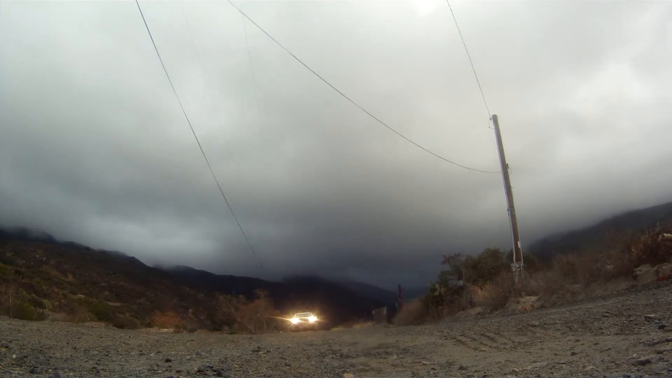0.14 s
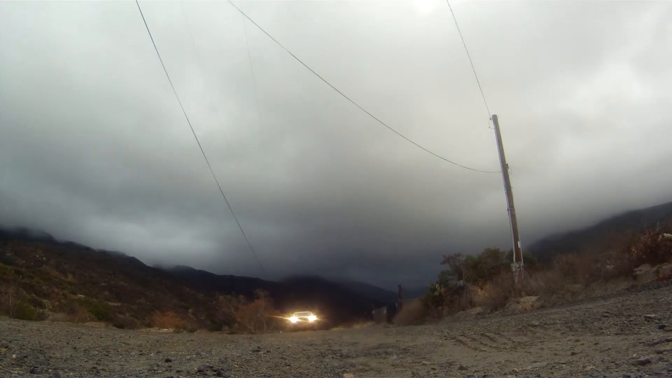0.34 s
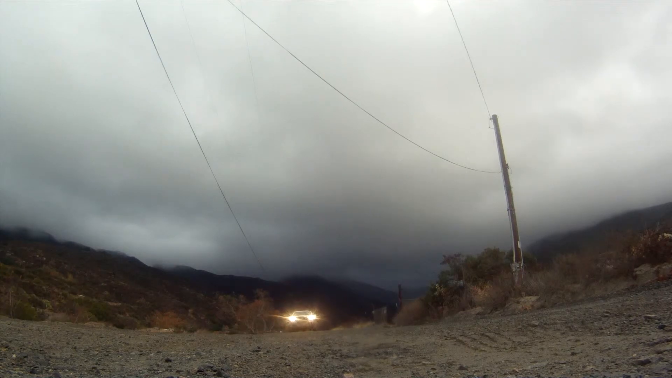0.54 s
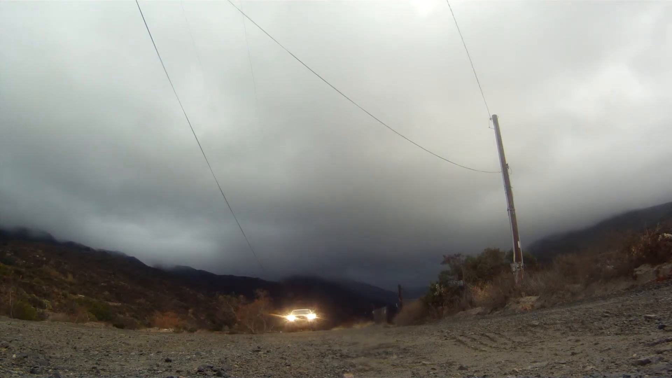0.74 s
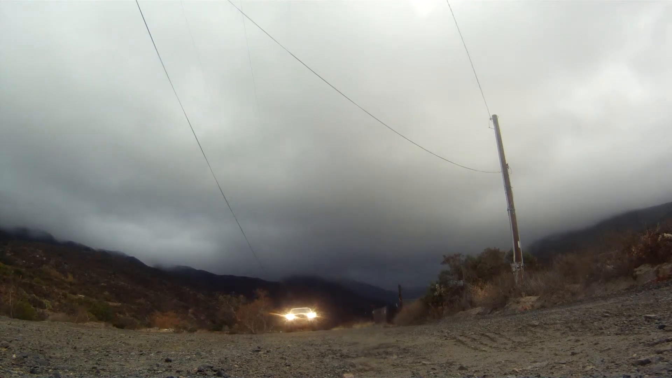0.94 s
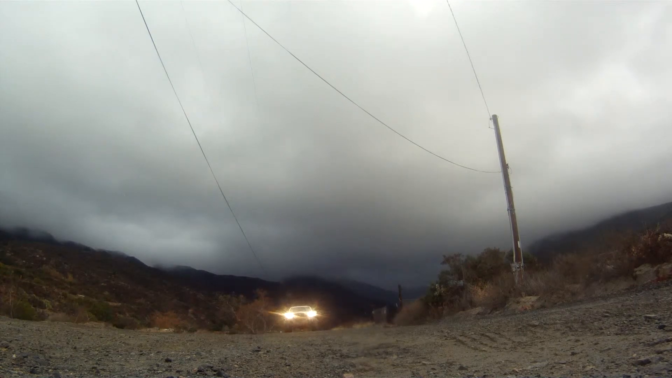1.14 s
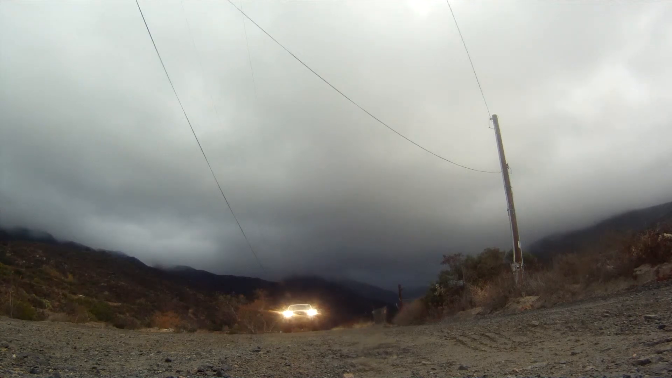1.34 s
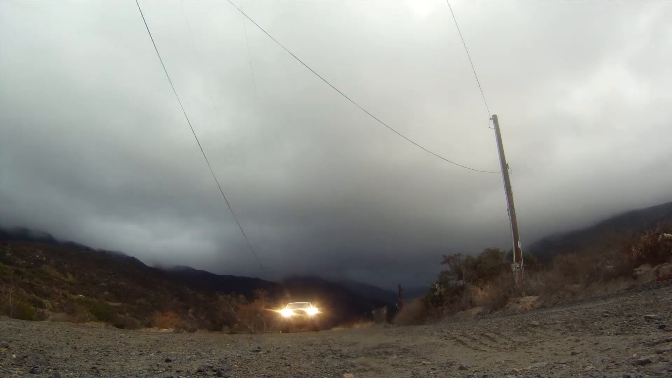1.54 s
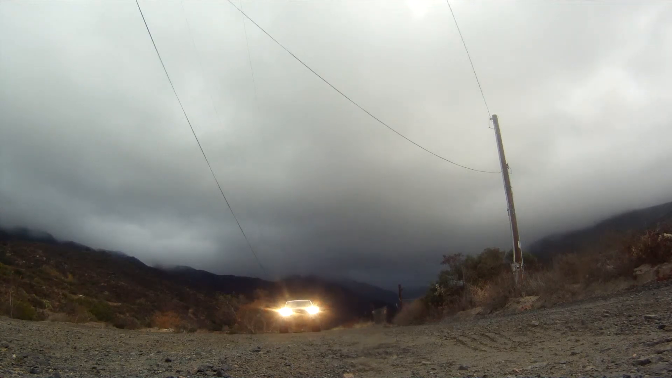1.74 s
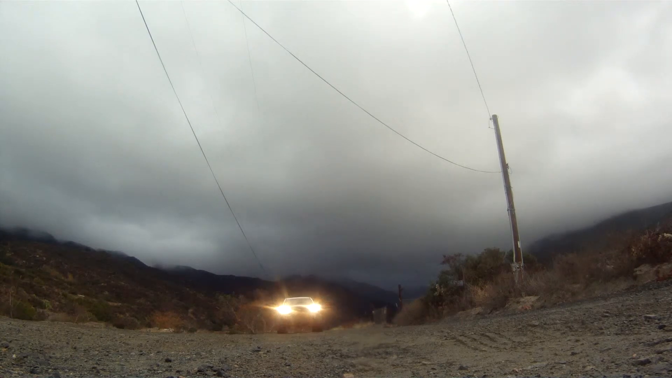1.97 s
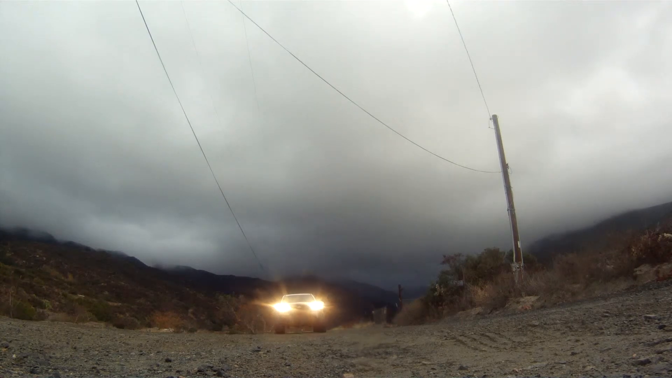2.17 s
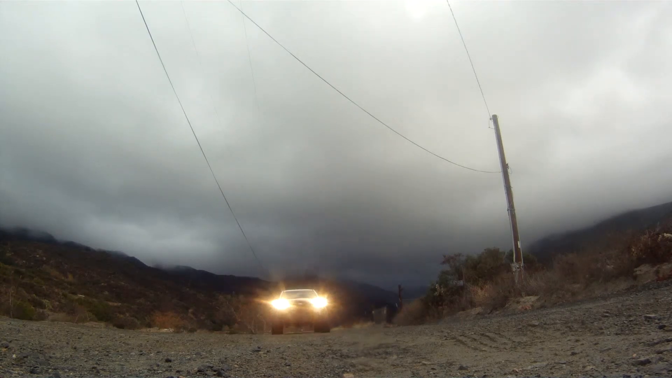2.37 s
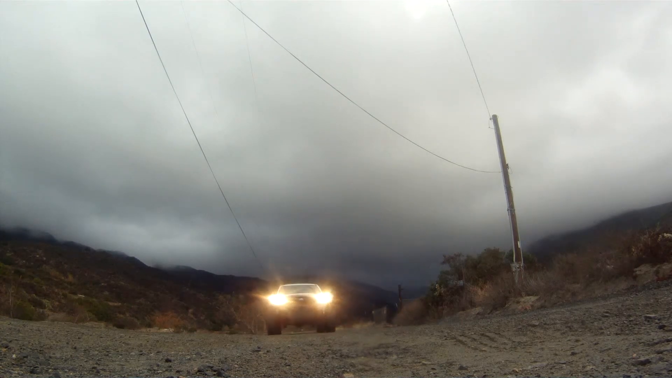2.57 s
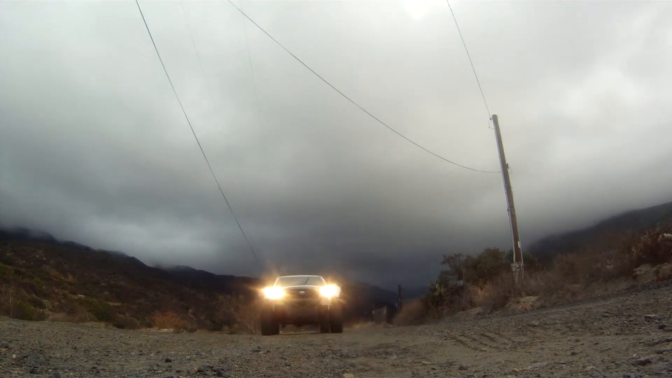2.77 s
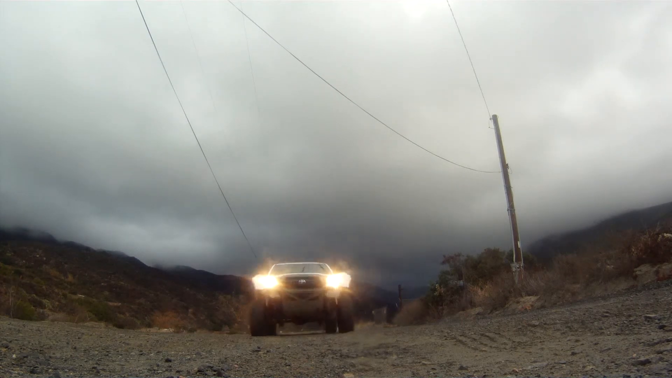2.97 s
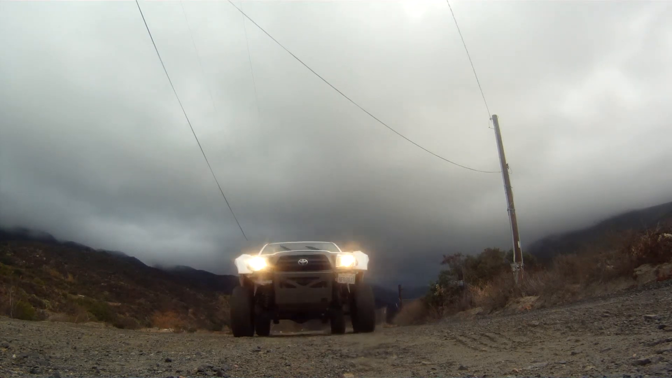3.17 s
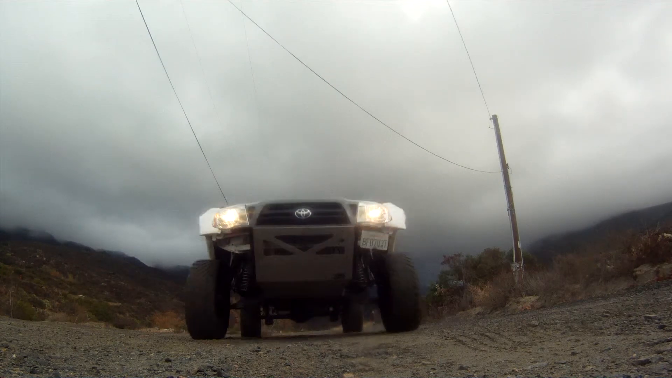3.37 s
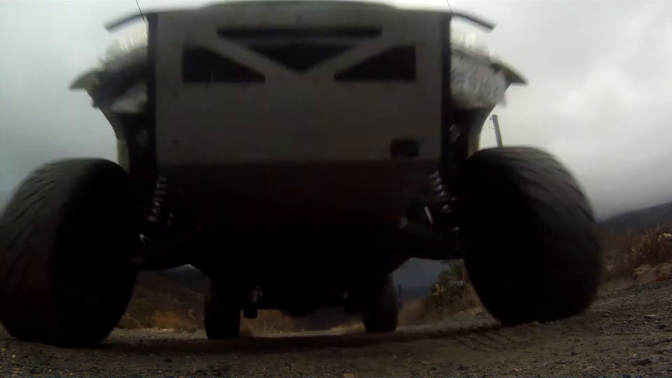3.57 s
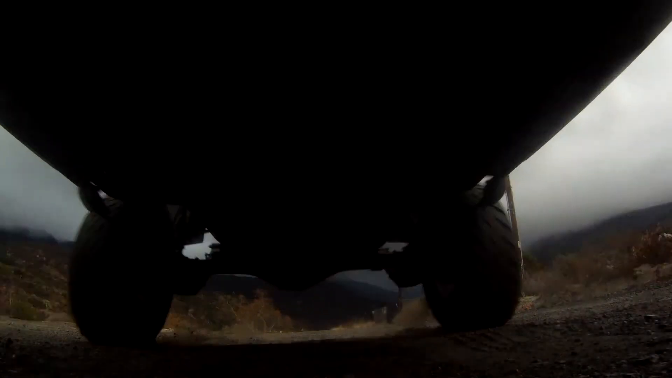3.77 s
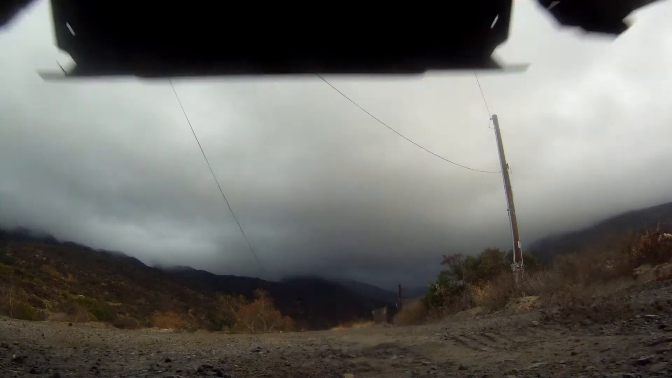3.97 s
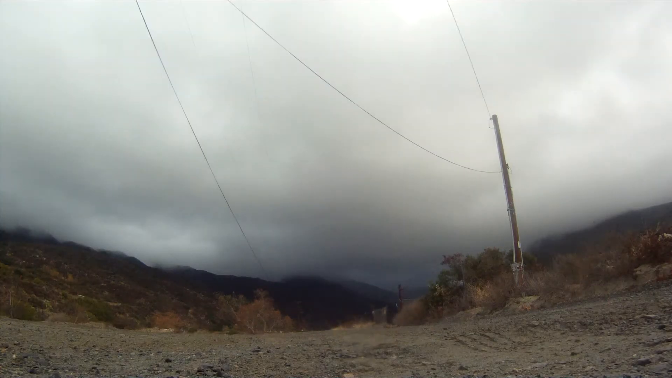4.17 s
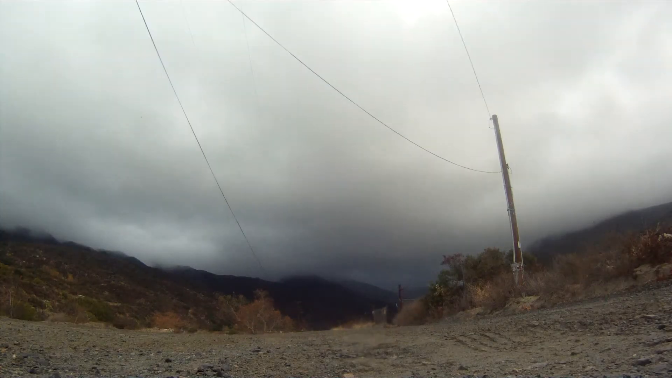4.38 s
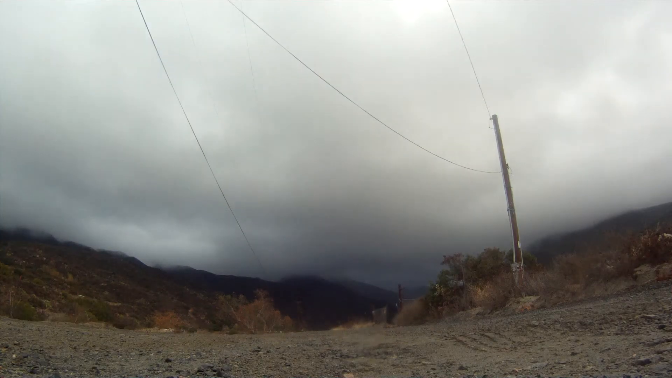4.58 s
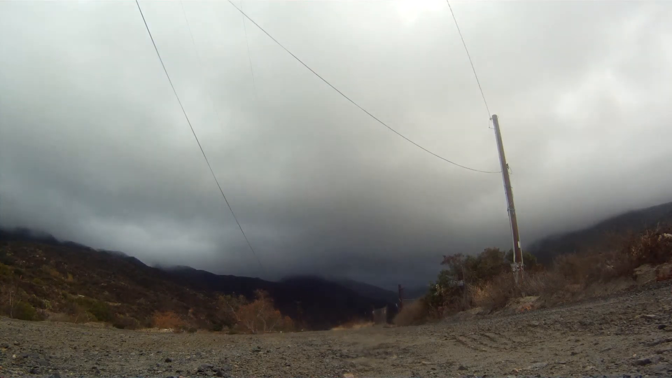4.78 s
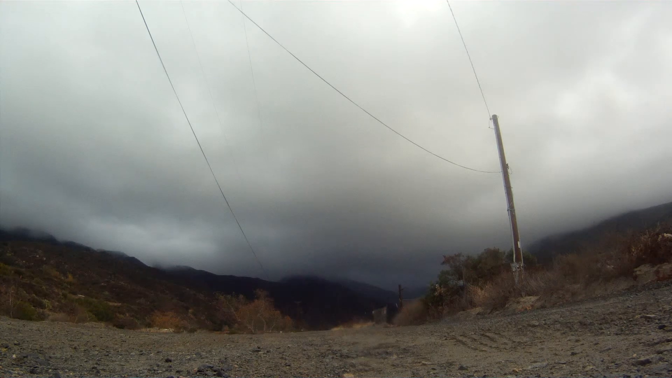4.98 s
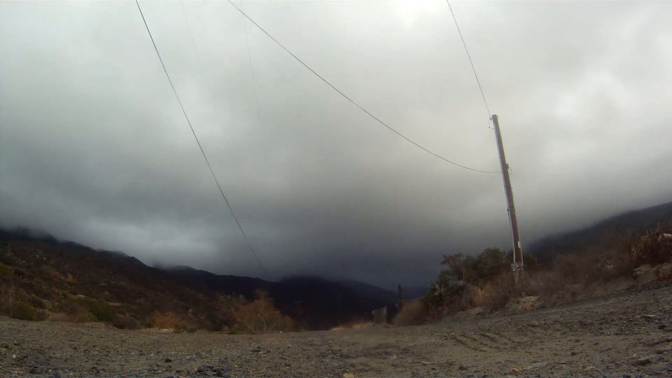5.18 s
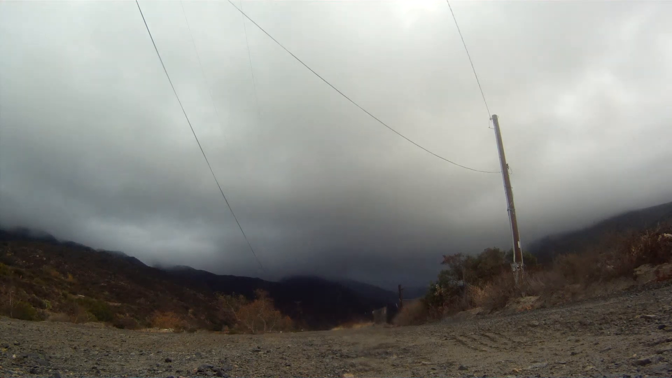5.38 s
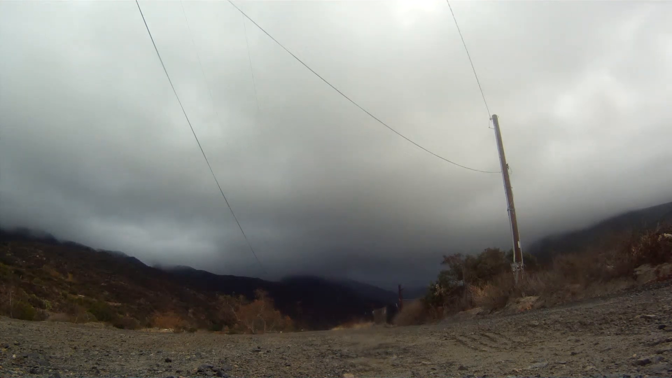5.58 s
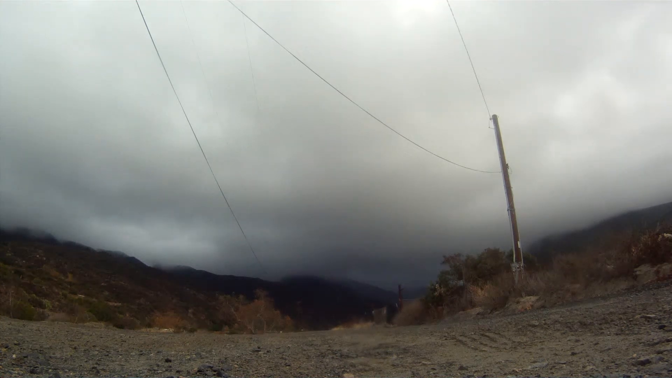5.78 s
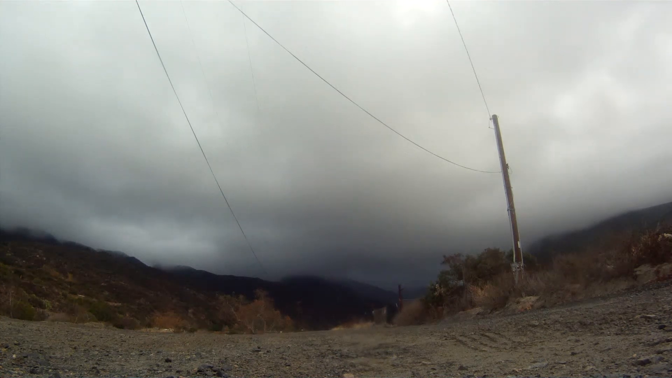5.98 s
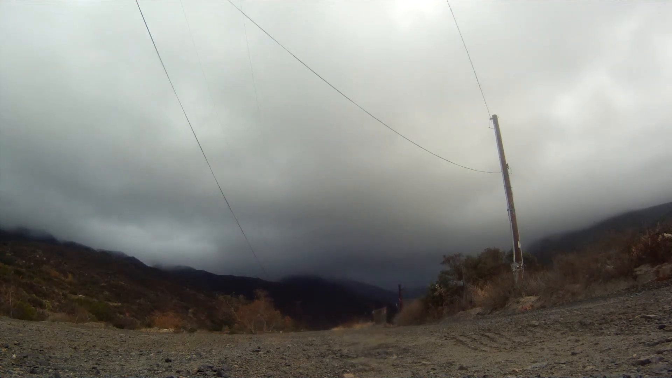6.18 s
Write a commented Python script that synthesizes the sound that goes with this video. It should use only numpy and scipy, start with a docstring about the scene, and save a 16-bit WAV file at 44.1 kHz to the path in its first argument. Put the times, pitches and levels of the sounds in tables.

```python
"""On a gravel track on an open hillside, a six-cylinder pickup drives straight over a small camera
on the ground and rolls away. The exhaust drones, the tyres roar and crunch, and ruts knock the
suspension. Air dragged along by the truck buffets the microphone, and thrown stones land behind it.
The camera holds each sample at a low rate, which mirrors the sound into a thin, glassy treble."""
import sys
import numpy as np
from scipy import signal
from scipy.fft import rfft, irfft, next_fast_len
from scipy.io import wavfile

SR = 44100
rng = np.random.default_rng(int(sys.argv[2]) if len(sys.argv) > 2 else 0)


def bounce(signal):
    """Save signal as a 16-bit WAV file at the path given by the first command-line argument."""
    frames = np.transpose(np.atleast_2d(signal))
    limited = np.clip(frames, -1, 1)
    pcm = np.round(limited * 32767).astype(np.int16)
    wavfile.write(sys.argv[1], SR, pcm)


N = 274302
TIME = np.arange(N) / SR
# when each part of the truck is over the microphone
FRONT_S, BAY_S, CHASSIS_S, REAR_S, TAILPIPE_S = 3.758, 3.785, 3.797, 3.92, 3.945


def gain_of(db):
    """Turns decibels into a number to multiply by."""
    return 10 ** (np.asarray(db) / 20)


def evened(x):
    """Scales x to an average strength (rms) of 1."""
    return x / np.sqrt(np.mean(x ** 2) + 1e-20)


def curves(table):
    """Joins the rows of a time table with straight lines, one curve a column."""
    times, *columns = np.transpose(table)
    return [np.interp(TIME, times, column) for column in columns]


def during(table, fade_s=0.23):
    """1 from a table's first time to its last, fading out beyond them."""
    start, end = table[0][0], table[-1][0]
    return np.interp(TIME, [start - fade_s, start, end, end + fade_s], [0, 1, 1, 0])


def gain_at(spectrum, hz):
    """Looks up hz in a spectrum (a table of level by frequency); past its end the gain falls fast."""
    f, db = np.transpose(spectrum)
    octaves = np.log2(hz + 1)
    beyond = np.maximum(octaves - np.log2(f[-1]), 0)
    return gain_of(np.interp(octaves, np.log2(f), db) - 40 * beyond)


def colour(x, spectrum):
    """Filters x by a spectrum, then scales it to a strength of 1."""
    size = next_fast_len(len(x))
    gains = gain_at(spectrum, np.fft.rfftfreq(size, 1 / SR))
    return evened(irfft(rfft(x, size) * gains, size)[:len(x)])


def drift(rate_hz):
    """A smooth random wobble of strength 1, up to about rate_hz fast."""
    t = TIME[::32]
    hz = np.fft.rfftfreq(len(t), t[1])
    slow = irfft(rfft(rng.standard_normal(len(t))) / (1 + (hz / rate_hz) ** 4), len(t))
    return np.interp(TIME, t, evened(slow))


def grains(per_s, spread_db):
    """Random clicks of mixed sizes."""
    sizes = gain_of(spread_db * np.minimum(rng.exponential(1, N), 4))
    return rng.standard_normal(N) * sizes * (rng.random(N) < per_s / SR)


def add(mix, at_s, sound):
    """Lays a sound into the mix, starting at at_s."""
    part = mix[round(at_s * SR):][:len(sound)]
    part += sound[:len(part)]


def crossing(at_s, over_s):
    """Goes from 0 to 1 in over_s, centred on at_s."""
    return np.clip(.5 + (TIME - at_s) / over_s, 0, 1)


def swell(at_s, half_s):
    """A smooth rise and fall, 1 at at_s."""
    return np.exp(-((TIME - at_s) / half_s) ** 2)


def passing(at_s, near_m, ahead_db, behind_db, speed_m_per_s=14.42):
    """Gain of a passing part: 1 when closest, ahead_db or behind_db less as the distance doubles."""
    along_m = speed_m_per_s * (TIME - at_s)
    doublings = np.log2(np.hypot(along_m / near_m, 1))
    return gain_of(-doublings * np.where(along_m < 0, ahead_db, behind_db))


def wheels(front_db, rear_db, near_m, ahead_db, behind_db):
    """Gain of the front and rear wheels passing in turn."""
    return np.hypot(gain_of(front_db) * passing(FRONT_S, near_m, ahead_db, behind_db),
                    gain_of(rear_db) * passing(REAR_S, near_m, ahead_db, behind_db))


def once_past(drop_db, over_s):
    """Once the truck has passed, its sound drops by drop_db."""
    return gain_of(-drop_db * np.clip((TIME - REAR_S) / over_s, 0, 1))


def engine_gain(bay_db=-28.5, tailpipe_db=-21):
    """The engine bay carries far ahead; the tailpipe booms only close by."""
    bay = gain_of(bay_db) * passing(BAY_S, near_m=0.67, ahead_db=5.5, behind_db=7.0)
    tailpipe = gain_of(tailpipe_db) * passing(TAILPIPE_S, near_m=1.16, ahead_db=9, behind_db=12)
    return np.hypot(bay, tailpipe) * once_past(drop_db=9, over_s=0.37)  # the driver lifts off


# how often the cylinders fire, before any wobble: t/s, f/Hz
FIRING = [(0.0, 141.8), (0.16, 118.4), (0.3, 107.1), (0.75, 99.8), (1.0, 111.1), (1.25, 117), (1.84, 116.4),
          (1.96, 128.4), (2.1, 124.1), (2.42, 126.8), (2.85, 136), (3.3, 145), (3.5, 130), (3.65, 123.6),
          (3.9, 117.6), (4.1, 85.8), (4.42, 85.15), (4.65, 74.6)]
# the driven wheels hop and swing the revs: middle t/s, half length/s, hop f/Hz, share of the revs
WHEEL_HOP = (3.16, .22, 6.13, 0.058)
# tones at 1, 2, 3... times half the firing rate: level ahead/dB, level under the tailpipe/dB
EXHAUST_TONES = [(-17.5, -19), (-0.5, 0), (-15.5, -13.5), (-14, -13.5), (-14.5, -27.5), (-21, -23.5),
                 (-12.5, -31.5), (-23, -30), (-13, -48)]
# how the drone changes: t/s, tailpipe share (0-1), lift of the upper tones/dB
EXHAUST_BLEND = [(0, 0.26, 1), (1.85, 0.08, -2.5), (1.98, 0.12, 0.5), (3.1, 0.07, 2.5), (3.5, 0.08, 3),
                 (3.88, 0.78, -1), (4.17, 1, 5.5)]
# the pipe favours some pitches over others: f/Hz, level/dB
PIPE_SPECTRUM = [(40, 1.5), (150, 0.5), (190, 1.5), (240, -2), (275, 1.5), (310, -1.5), (360, 2),
                 (400, -3.5), (438, 4), (468, -4), (500, -8.5), (700, -4)]

def engine(uneven_db=-25, waver=0.33, jitter=0.00715, bumps=0.0074, cruise_hz=120):
    """Six cylinders fire in two banks of three and drone; unequal cylinders add weak extra tones."""
    steady_hz, = curves(FIRING)
    tailpipe, lift_db = curves(EXHAUST_BLEND)
    hop_s, hop_half_s, hop_hz, hop_share = WHEEL_HOP
    hop = swell(hop_s, hop_half_s) * np.cos(2 * np.pi * hop_hz * (TIME - hop_s))
    firing_hz = steady_hz * (1 + hop_share * hop)
    pulling_hard = crossing(2.09, over_s=.6) * (1 - crossing(3.4, over_s=0.32))
    jolts = bumps * drift(6.85) * pulling_hard  # bumps shake the revs
    firings = np.cumsum(firing_hz * (1 + jolts + jitter * drift(22.63))) / SR
    drone = np.zeros(N)
    for k, (ahead_db, behind_db) in enumerate(EXHAUST_TONES, 1):
        tone_db = ahead_db + tailpipe * (behind_db - ahead_db) + lift_db * (k > 2)
        unsteady = 1 + (.06 if k == 2 else waver) * drift(14.3)  # the firing tone is the steadiest
        tone = np.cos(np.pi * k * firings + 2 * np.pi * rng.random())
        drone += gain_of(tone_db) * gain_at(PIPE_SPECTRUM, firing_hz * k / 2) * unsteady * tone
    cycle = 2 * np.pi * firings / 6
    uneven = sum(np.cos(k * cycle + 2 * np.pi * rng.random()) for k in range(4, 15) if k % 3)
    drone += gain_of(uneven_db - 7 * tailpipe) * uneven * (1 + 0.75 * drift(11.6))
    effort = gain_of(2 * np.log2(firing_hz / cruise_hz))  # 2 dB louder at twice the revs
    return np.sqrt(2) * engine_gain() * effort * drone * during(FIRING)


# rough stretches of track: middle t/s, level/dB, half length/s
ROUGH_PATCHES = [(0.879, -65.5, 0.054), (1.116, -58, 0.22), (1.721, -62, 0.099), (4.993, -55.5, 0.047)]

def rough_ground():
    """Gain of the extra noise that the wheels make on rough stretches."""
    return sum(gain_of(db) * swell(at_s, half_s) for at_s, db, half_s in ROUGH_PATCHES)


# the tread's roar, and a hollow knock near 1 kHz from ahead and from behind: f/Hz, level/dB
ROAR_SPECTRUM = [(30, -21), (65, 6.5), (160, 5.5), (230, 2), (330, -1), (400, 0.5), (490, 1), (680, -1.5),
                 (900, -2.5), (1300, -33), (1700, -24)]
KNOCK_AHEAD = [(500, -32), (720, -7), (850, 0.5), (1000, 5.5), (1130, 1.5), (1220, -11), (1330, -19),
               (1600, -15.5), (2200, -29), (3000, -47)]
KNOCK_BEHIND = [(450, -43), (580, -0.5), (790, -7.5), (970, -28), (1080, 5.5), (1170, 4.5), (1270, -10.5),
                (1400, -2.5), (1520, -22), (2500, -28)]

def tyres(knock_db=-34.5, rough_roar_db=-7, sway_db=2.1, clump_db=2.0):
    """Tread roars on the dirt and knocks in clumps, more on rough ground, thinner from behind."""
    rough = rough_ground()
    rolling = wheels(front_db=-35, rear_db=-33.5, near_m=0.83, ahead_db=6.5, behind_db=6.0)
    rolling *= once_past(drop_db=7.0, over_s=0.34)
    shaking = gain_of(knock_db) * passing(CHASSIS_S, near_m=1.77, ahead_db=7.0, behind_db=4.5)
    shaking *= once_past(drop_db=14.0, over_s=0.11)
    pulling_away = gain_of(-7 * np.clip(1 - TIME / 2.68, 0, 1))  # quieter until it gathers speed
    roar_gain = np.hypot(pulling_away * rolling, gain_of(rough_roar_db) * rough)
    roar = colour(rng.standard_normal(N), ROAR_SPECTRUM) * gain_of(sway_db * drift(25))
    blows = grains(per_s=5000, spread_db=2.0) * gain_of(clump_db * drift(29.0))
    behind = crossing(3.984, over_s=0.34)
    knock = (1 - behind) * colour(blows, KNOCK_AHEAD) + behind * colour(blows, KNOCK_BEHIND)
    return roar * roar_gain + knock * np.hypot(pulling_away * shaking, rough)


# grinding stones, a thin whining hiss as the truck approaches, and sand close by: f/Hz, level/dB
CRUNCH_SPECTRUM = [(1000, -17), (1400, -10), (1620, -4), (1850, 0), (2080, -1), (2330, 1.5), (2550, 0.5),
                   (2850, -12.5), (3400, -13), (5000, -22)]
WHINE_SPECTRUM = [(2000, -16), (2900, -34), (3500, -21), (4200, -5), (4600, 10), (4820, 6), (5050, 11),
                  (5400, 1.5), (6000, 4.5)]
FIZZ_SPECTRUM = [(2000, -39), (2900, -5), (3500, -8), (4100, 2.5), (4700, -2), (5200, -2), (6000, -6.5)]

def gravel(rough_db=-13, whine_db=-6, clump_db=1.2, arrival_s=3.688):
    """Stones grind under the tread; a thin, whining hiss gives way to sand as the wheels arrive."""
    clumps = gain_of(clump_db * drift(35))
    crunch = colour(grains(per_s=12000, spread_db=0.5) * clumps, CRUNCH_SPECTRUM)
    fine_clicks = grains(per_s=9000, spread_db=-2.5) * clumps
    close = crossing(arrival_s, over_s=0.053)
    whine = gain_of(whine_db) * colour(fine_clicks, WHINE_SPECTRUM)
    hiss = (1 - close) * whine + close * colour(fine_clicks, FIZZ_SPECTRUM)
    crunch_gain = wheels(front_db=-33, rear_db=-35.5, near_m=1.165, ahead_db=11.0, behind_db=9.5)
    hiss_gain = wheels(front_db=-41, rear_db=-50.5, near_m=1.13, ahead_db=8, behind_db=12)
    return crunch * np.hypot(crunch_gain, gain_of(rough_db) * rough_ground()) + hiss * hiss_gain


# the background hush: f/Hz, level/dB
HUSH_SPECTRUM = [(15, -39), (25, -3.5), (96, -0.5), (201, -4), (376, -9), (564, -9), (630, -11), (902, -8),
                 (965, -7.5), (1080, -5.5), (1320, -17.5), (4240, -22), (5300, -24), (6890, -28),
                 (11700, -120)]

def hillside(level_db=-60.5):
    """The steady hush of the open hillside."""
    return gain_of(level_db) * colour(rng.standard_normal(N), HUSH_SPECTRUM)


def ring(spectrum, size=2048):
    """How a body with this spectrum rings after one blow, scaled to a peak of 1."""
    log_gain = np.log(gain_at(spectrum, abs(np.fft.fftfreq(size, 1 / SR))) + 1e-5)
    # the Hilbert step makes the ringing follow the blow, never lead it
    response = np.fft.ifft(np.exp(signal.hilbert(log_gain).conj())).real[:size // 2]
    return response / abs(response).max()


# the suspension knocks over a rut: t/s, relative level/dB
RUT_KNOCKS = [(0.98, -45), (1.022, -42), (1.153, -39), (1.219, -44.5), (1.25, -51), (1.321, -43),
              (1.824, -42), (2.312, -48), (2.443, -42.5), (2.462, -49), (3.275, -32.5), (3.383, -34),
              (3.704, -22), (3.815, -22), (3.855, -29)]

def ruts(level_db=-3, rattle=0.16, rattle_s=0.0077):
    """Each rut gives one blow and a short rattle: a hollow knock ringing near 1 kHz."""
    out, hollow_ring, t = np.zeros(N), ring(KNOCK_AHEAD), TIME[:SR // 12]
    for at_s, peak_db in RUT_KNOCKS:
        blow = rattle * rng.standard_normal(len(t)) * np.exp(-t / rattle_s)
        blow[0] += 1
        knock = signal.fftconvolve(blow, hollow_ring)
        add(out, at_s, gain_of(peak_db + level_db) * knock / abs(knock).max())
    return out


# the rumble of air on the microphone: f/Hz, level/dB
BUFFET_SPECTRUM = [(10, -21), (27, 2), (45, -6), (80, -15), (150, -9), (400, -27)]
# swirls of air: middle t/s, level/dB, half length/s
GUSTS = [(3.92, -52, .12), (4.19, -47, .05), (4.3, -59, 0.061), (4.555, -57, 0.076), (4.85, -64, 0.15)]

def air_gusts():
    """The air dragged along by the truck buffets the microphone in a few gusts."""
    strength = sum(gain_of(db) * swell(at_s, half_s) for at_s, db, half_s in GUSTS)
    return colour(rng.standard_normal(N), BUFFET_SPECTRUM) * strength


# one thud: t/s, level/dB, f/Hz, length/s
AXLE_THUD = (3.933, -18, 680, .0042)

def axle():
    """The rear axle passes with a dead thud: a few vibrations and no ring."""
    at_s, db, hz, length_s = AXLE_THUD
    age = np.clip(TIME - at_s, 0, length_s)
    return gain_of(db) * np.sin(np.pi * age / length_s) ** 2 * np.sin(2 * np.pi * hz * age)


# the camera housing's short, bright ring at each stone tick: f/Hz, level/dB, 60 dB fade time/s
HOUSING_TONES = [(1700, -17, 0.0055), (2489, 3.5, 0.015), (3712, -12, 0.015), (4500, -1, 0.0064),
                 (5170, -2.5, 0.0092)]

def stone_tick(ping_hz, ping_db=-2, ping_fade_s=0.018, spread_db=2, detune=0.054, crack_s=0.00054):
    """One stone strikes: a dry crack, a ping, and the housing's ring, which varies from hit to hit."""
    t = TIME[:SR // 40]
    hz, db, fade_s = np.transpose(HOUSING_TONES)[:, :, None]
    weight, shift = rng.standard_normal((2, len(hz), 1))
    fades = gain_of(db + spread_db * weight - 60 * t / fade_s)
    housing = (fades * np.sin(2 * np.pi * hz * (1 + detune * shift) * t)).sum(0)
    ping = gain_of(ping_db - 60 * t / ping_fade_s) * np.sin(2 * np.pi * ping_hz * t)
    crack = colour(rng.standard_normal(len(t)), FIZZ_SPECTRUM) * np.exp(-t / crack_s)
    sound = housing + ping + gain_of(-1) * crack
    return sound / abs(sound).max()


# a thrown stone lands: t/s, relative level/dB, ping f/Hz
LANDINGS = [(3.9807, -22.5, 4070), (4.1935, -35, 3000), (4.2092, -32.5, 3580), (4.2744, -39.5, 3900),
            (4.3255, -36.5, 3565), (4.3809, -39, 2800), (4.4731, -27.5, 3750), (4.4853, -36, 3660),
            (4.557, -37, 3550), (4.5774, -42, 3640), (4.6116, -39, 3460), (4.6208, -44, 3220),
            (4.736, -48, 3060), (5.4167, -51, 3740), (5.4768, -49, 3450)]

def stones(level_db=1.0, grit_db=-53.0, size_db=9, settle_db_per_s=4, top_hz=4800, grit_count=50):
    """Big stones land one by one; grit keeps ticking down, ever fainter, bigger bits lower in pitch."""
    out = np.zeros(N)
    for at_s, peak_db, ping_hz in LANDINGS:
        add(out, at_s, gain_of(peak_db + level_db) * stone_tick(ping_hz))
    for when, size in rng.random((grit_count, 2)):
        delay_s = 1.4 * when
        peak_db = grit_db + size_db * size ** 2 - settle_db_per_s * delay_s
        add(out, 4.05 + delay_s, gain_of(peak_db) * stone_tick(top_hz / (1 + .5 * size)))
    return out


# the patter of grit: f/Hz, level/dB
PATTER_SPECTRUM = [(700, -16), (1200, 1.5), (1450, -2.5), (1700, -2), (2100, 5.5), (2500, -8),
                   (3000, -11.5), (5500, -20.5)]
# a handful of grit comes down: t/s, level/dB, fade time/s
SHOWERS = [(4.01, -36, 0.046), (4.282, -41, 0.027), (4.308, -45.5, 0.043), (4.375, -48, 0.043),
           (4.558, -57, 0.064), (4.942, -56.5, 0.024), (5.143, -55.5, 0.021)]

def grit_showers(rise_s=0.0035):
    """Grit thrown by the rear wheels patters down in short showers."""
    strength = np.zeros(N)
    for at_s, db, fade_s in SHOWERS:
        age = np.maximum(TIME - at_s, 0)
        strength += gain_of(db) * (1 - np.exp(-age / rise_s)) * np.exp(-(age / fade_s) ** 2)
    return strength * colour(grains(per_s=5800, spread_db=2.0), PATTER_SPECTRUM)


def scene():
    """The truck, what it throws up, and the hillside, in one channel."""
    truck = engine() + tyres() + ruts() + axle() + gravel() + air_gusts()
    return (truck + grit_showers() + stones() + hillside())[None]


def record(dry, corner_hz=5600, hold_hz=12000, top_hz=15400):
    """The camera cuts the treble, then holds each sample, which mirrors the sound around hold_hz."""
    size = next_fast_len(N + 2048)
    hz = np.fft.rfftfreq(size, 1 / SR)
    dulled = irfft(rfft(dry, size) / np.sqrt(1 + (hz / corner_hz) ** 48), size)[:, :N]
    mirrored = dulled * (1 + 2 * np.cos(2 * np.pi * hold_hz * TIME))
    held = irfft(rfft(mirrored, size) * np.sinc(hz / hold_hz), size)[:, :N]
    top_cut = signal.firwin(511, top_hz, window=("kaiser", 9), fs=SR)
    return signal.oaconvolve(held, top_cut[None], "same")


dry = scene()
out = record(dry)
bounce(out)
```